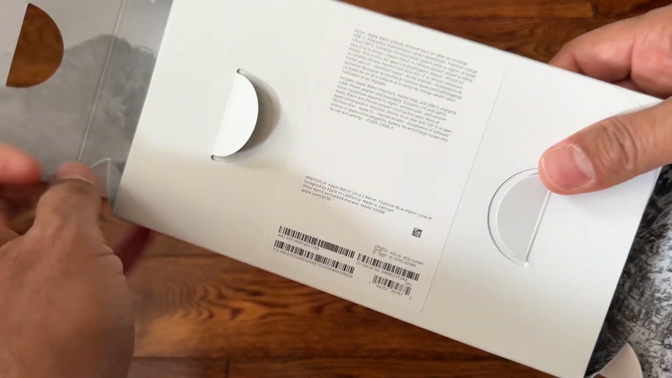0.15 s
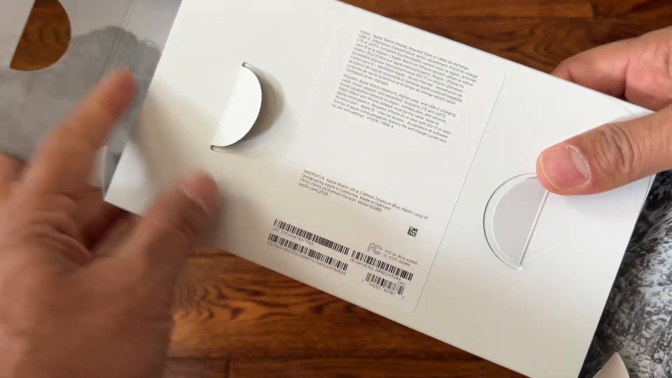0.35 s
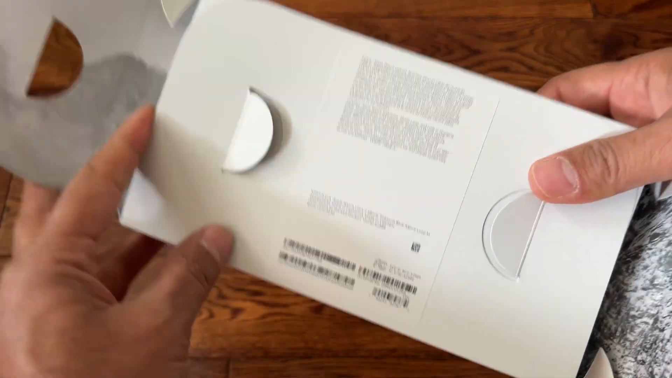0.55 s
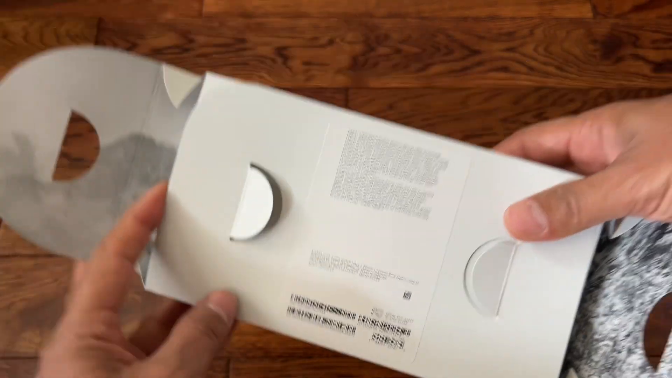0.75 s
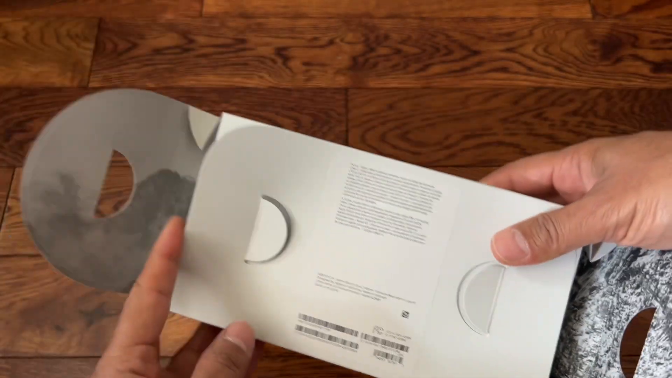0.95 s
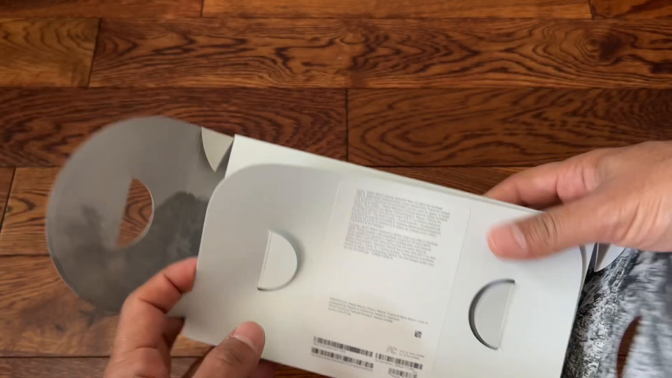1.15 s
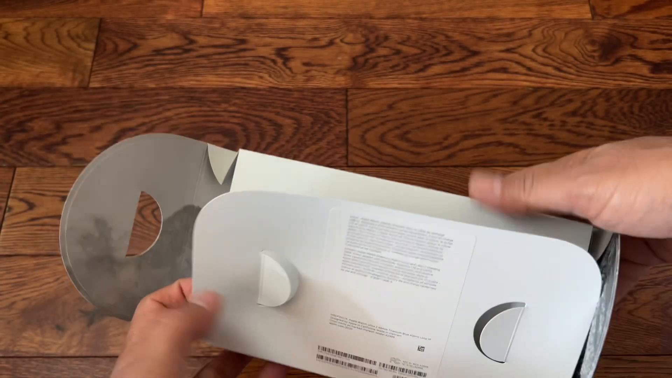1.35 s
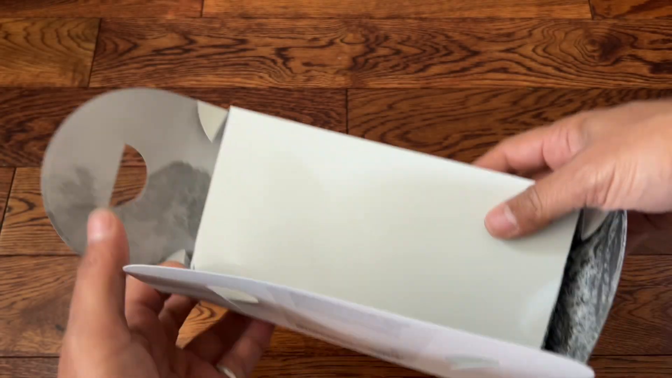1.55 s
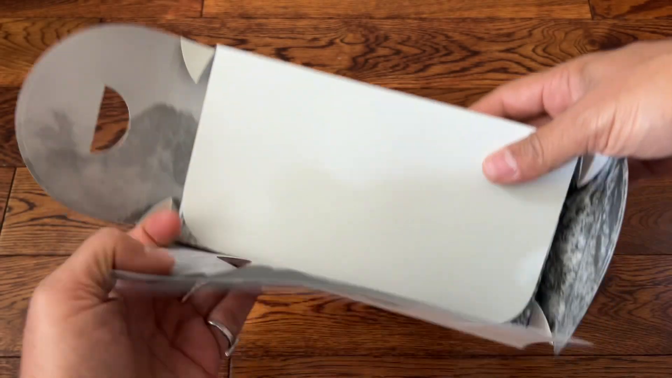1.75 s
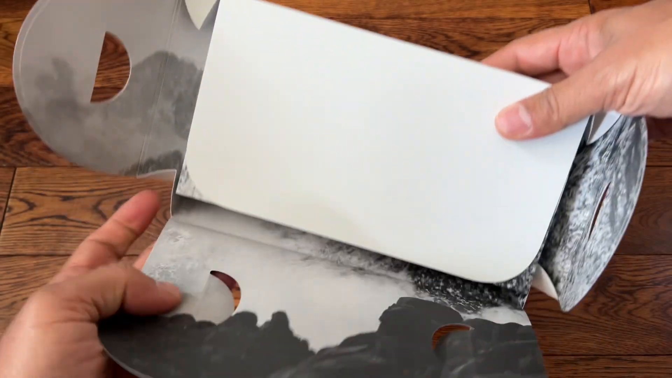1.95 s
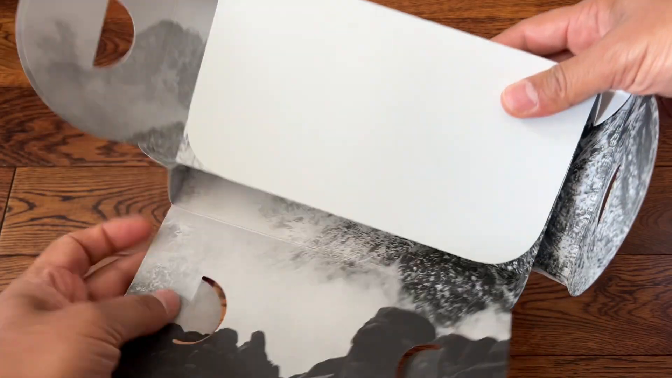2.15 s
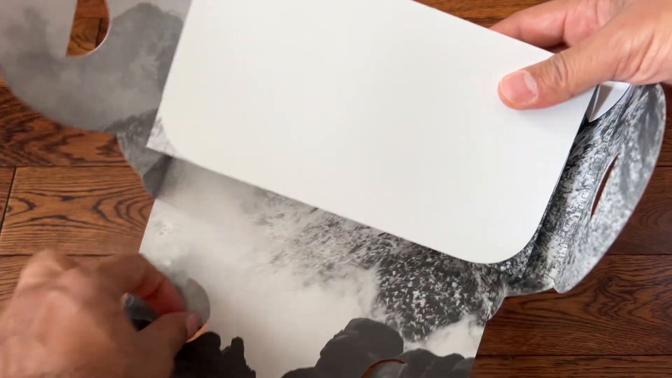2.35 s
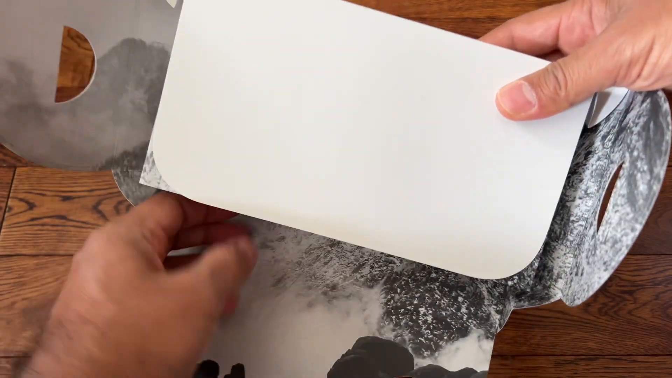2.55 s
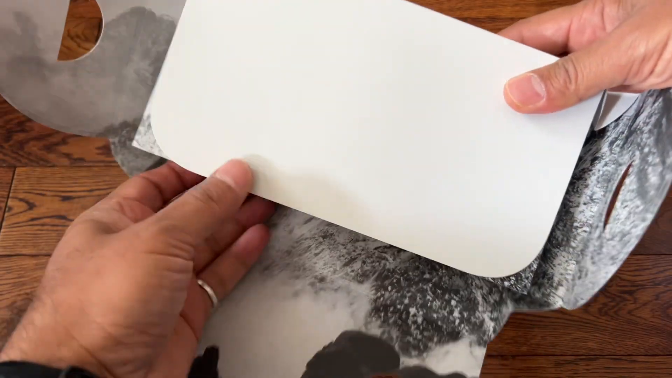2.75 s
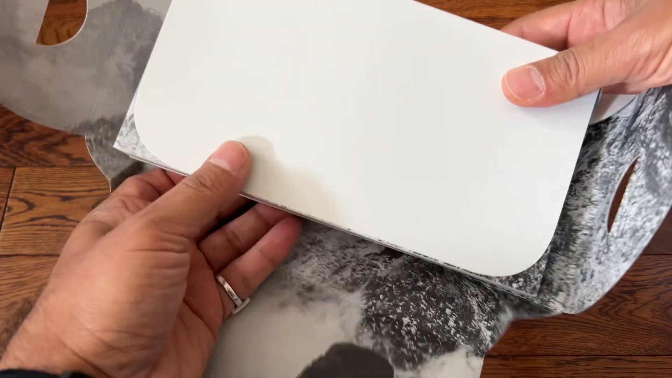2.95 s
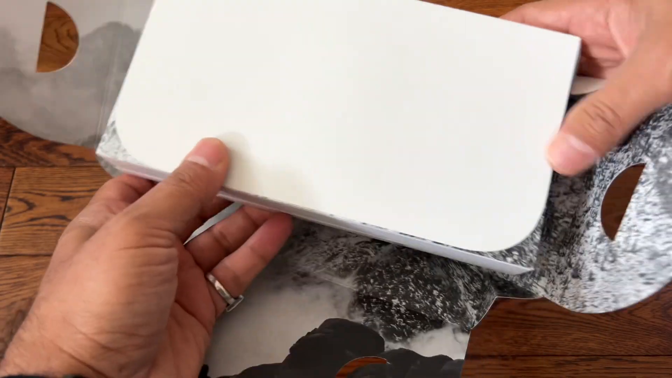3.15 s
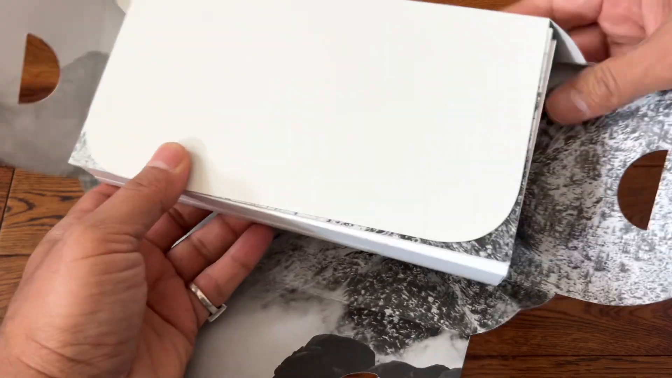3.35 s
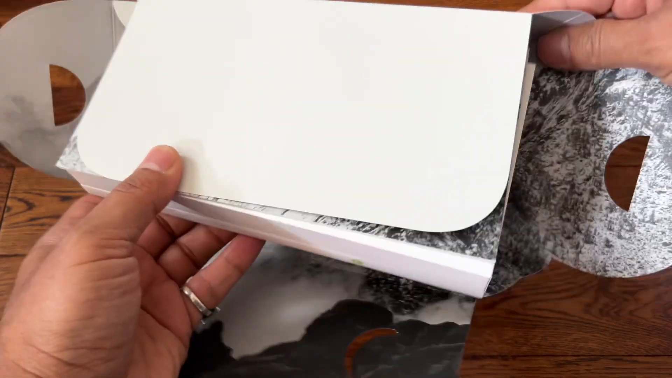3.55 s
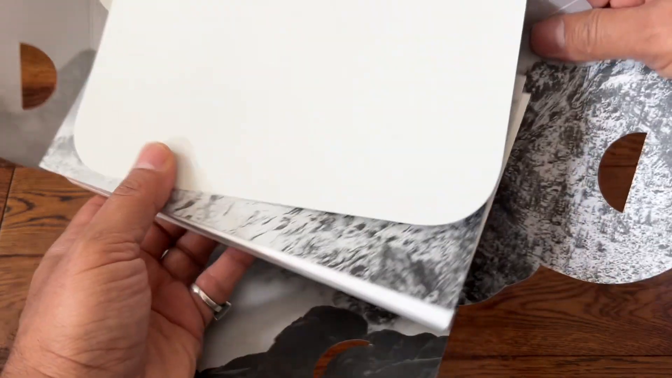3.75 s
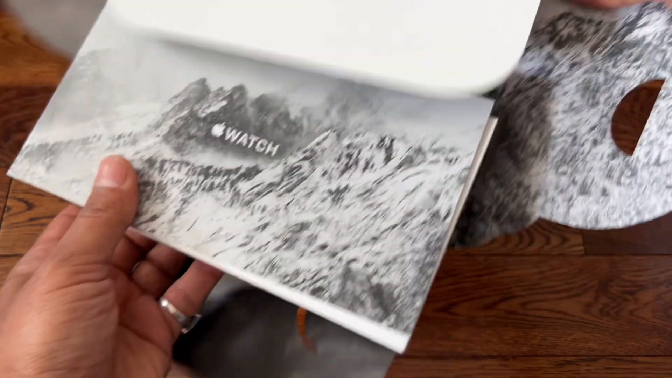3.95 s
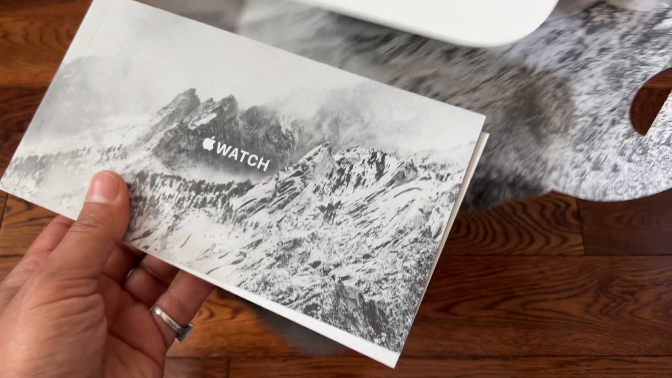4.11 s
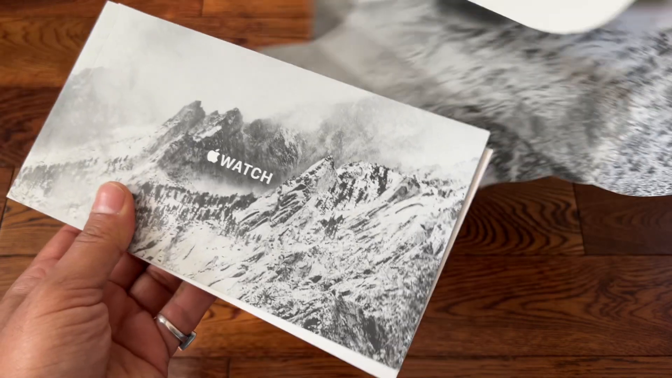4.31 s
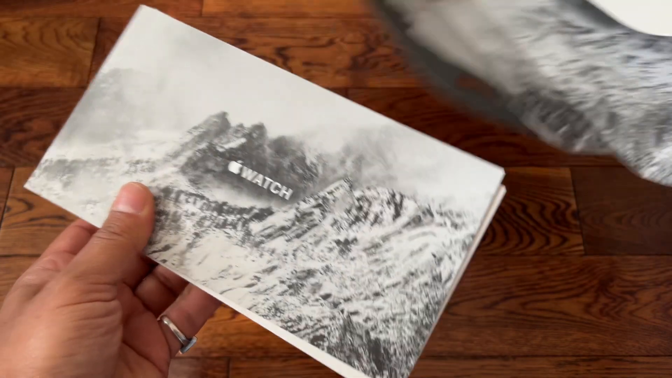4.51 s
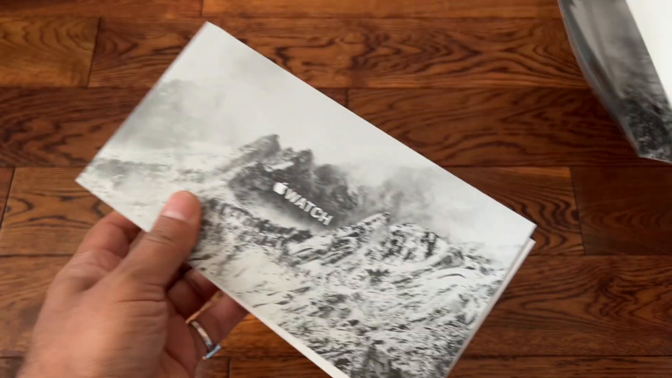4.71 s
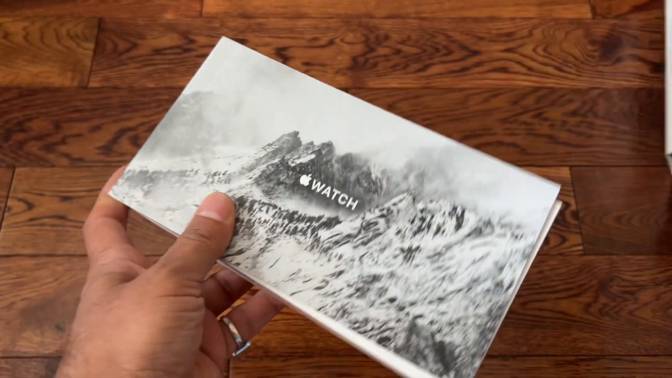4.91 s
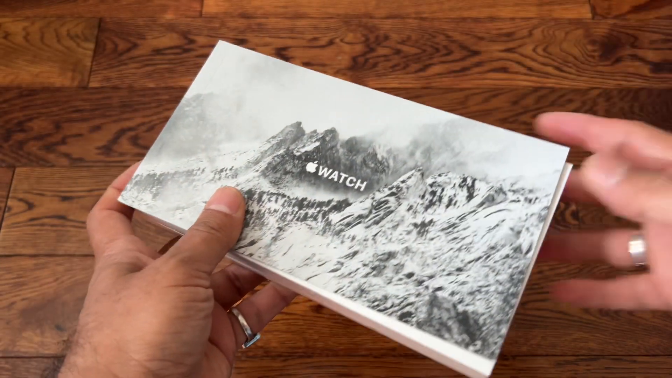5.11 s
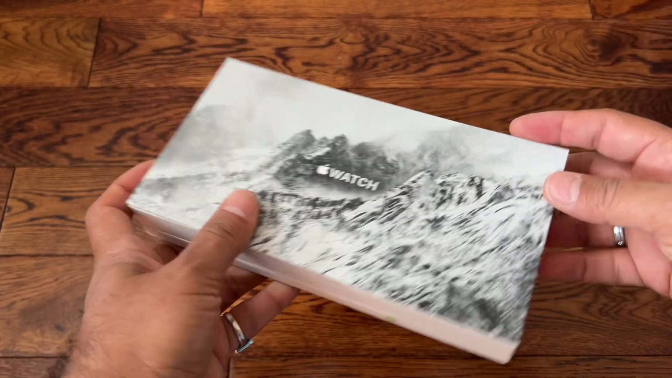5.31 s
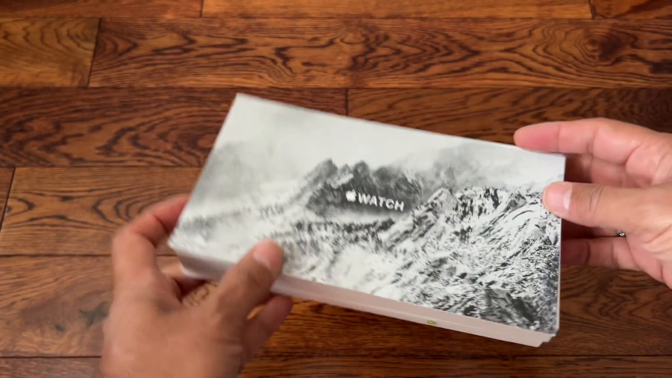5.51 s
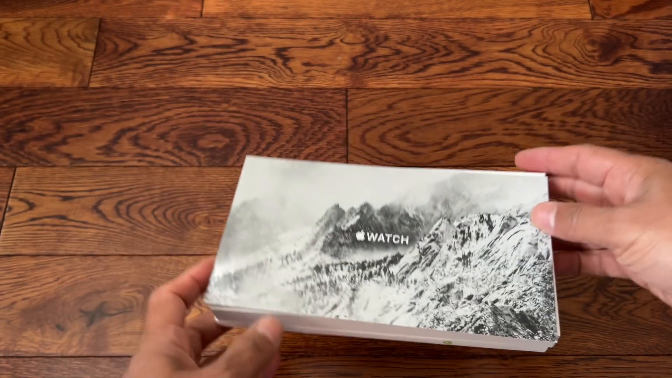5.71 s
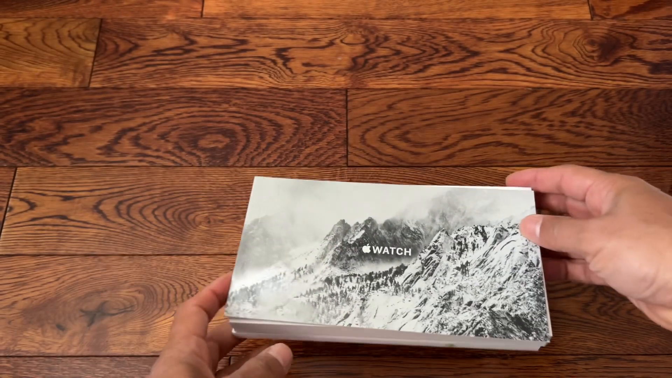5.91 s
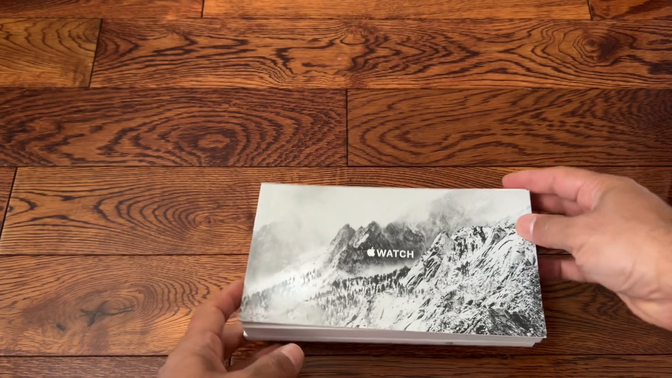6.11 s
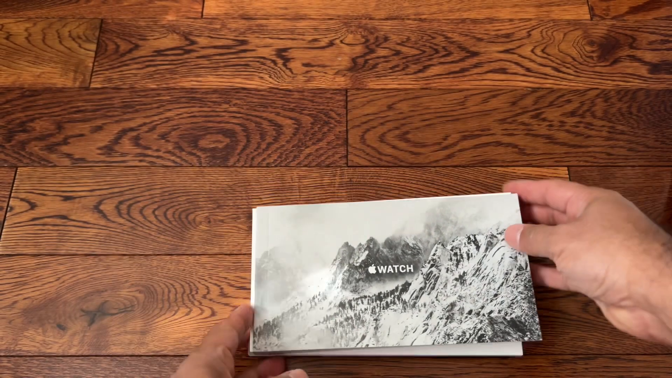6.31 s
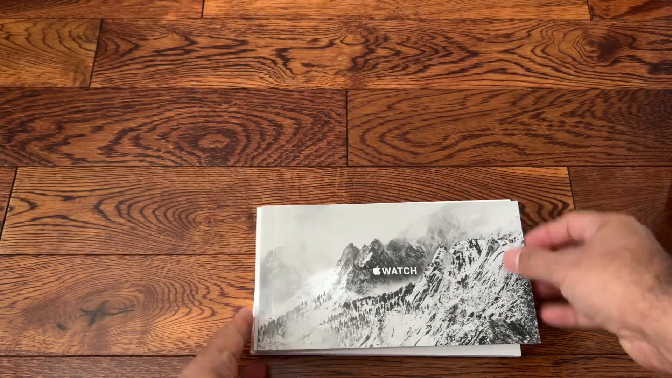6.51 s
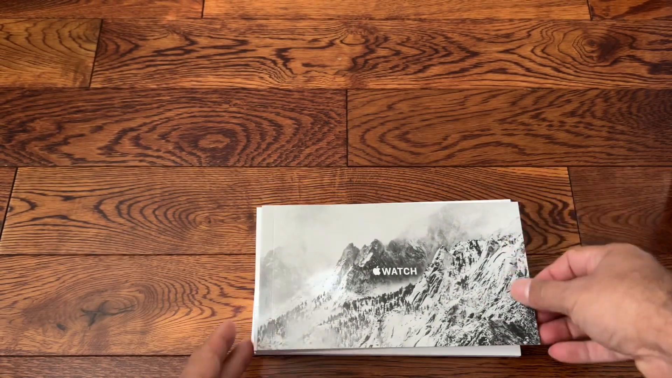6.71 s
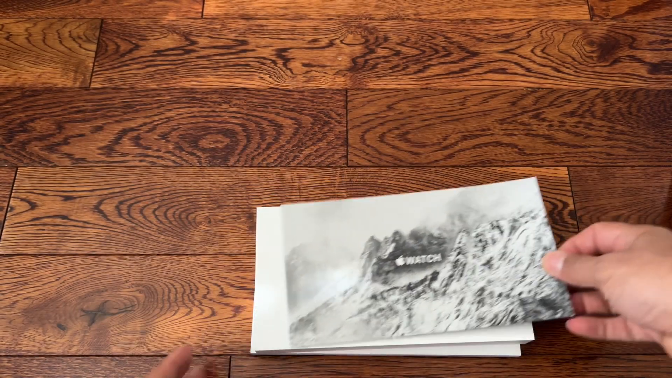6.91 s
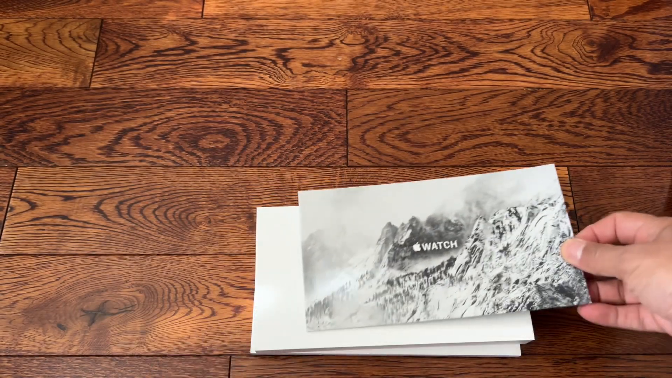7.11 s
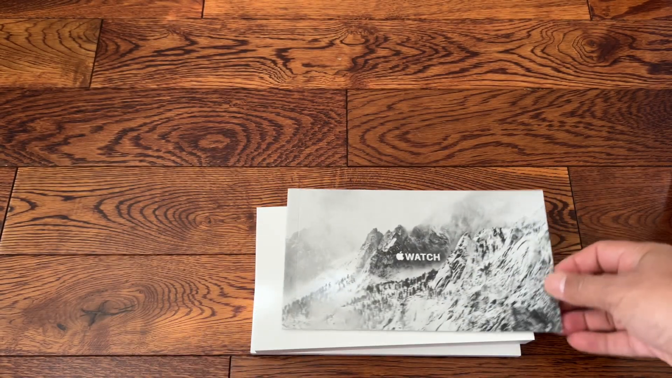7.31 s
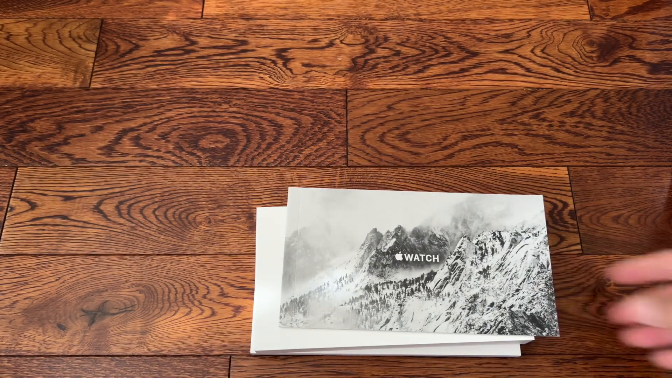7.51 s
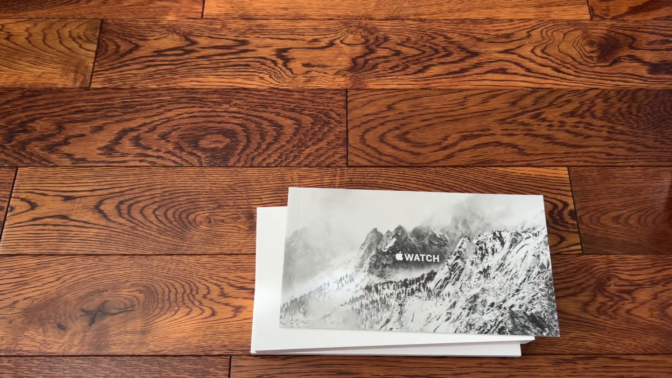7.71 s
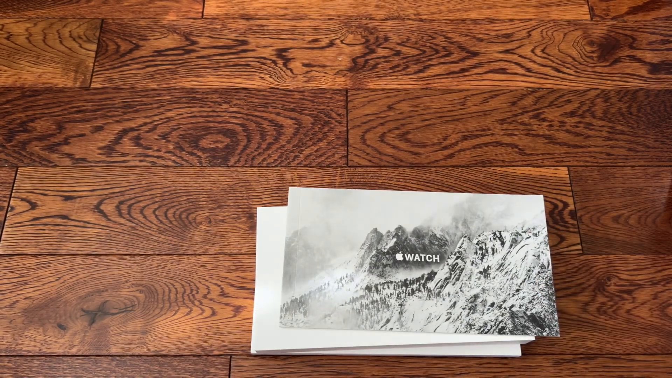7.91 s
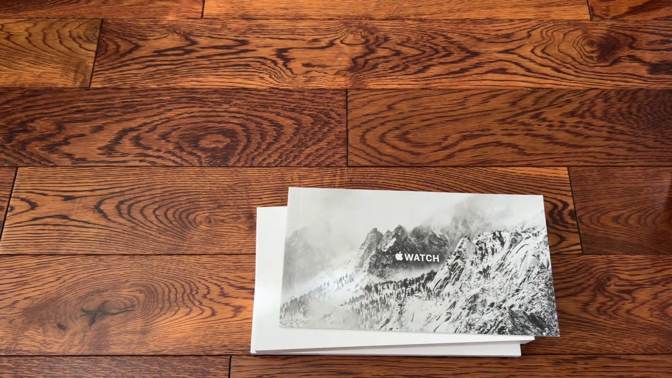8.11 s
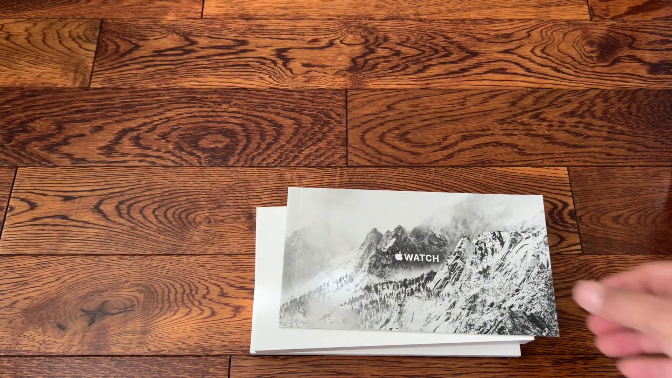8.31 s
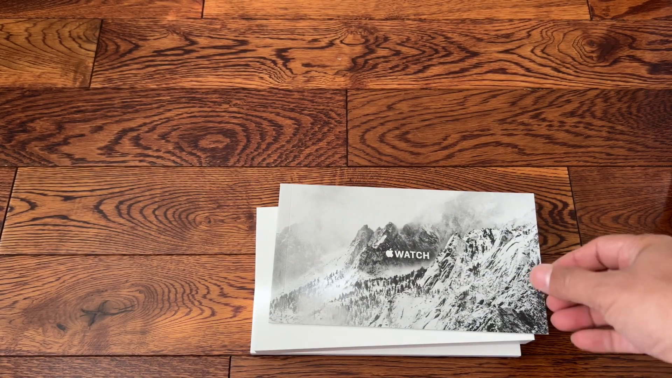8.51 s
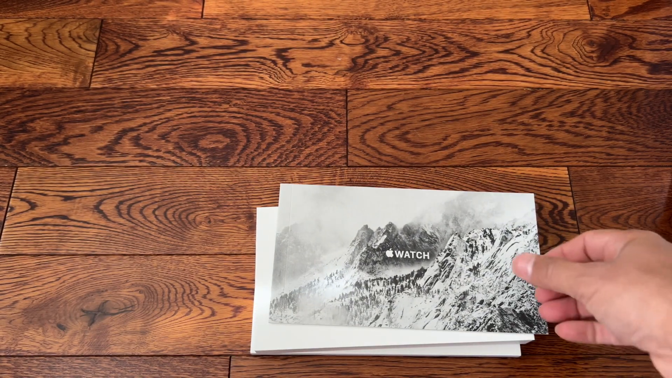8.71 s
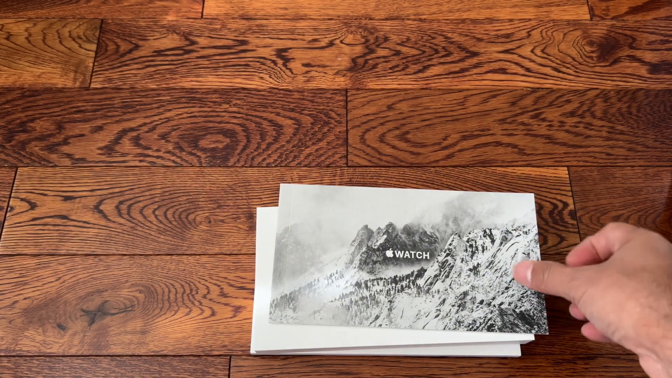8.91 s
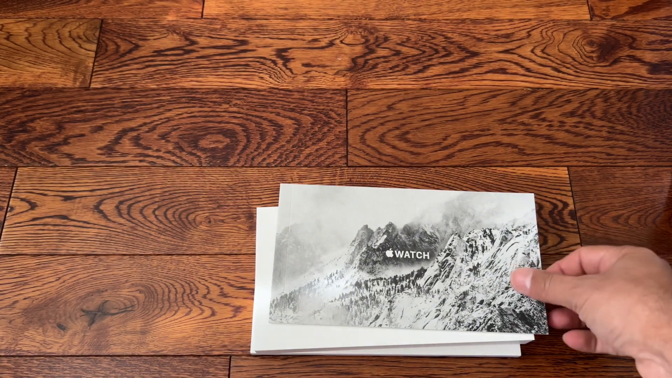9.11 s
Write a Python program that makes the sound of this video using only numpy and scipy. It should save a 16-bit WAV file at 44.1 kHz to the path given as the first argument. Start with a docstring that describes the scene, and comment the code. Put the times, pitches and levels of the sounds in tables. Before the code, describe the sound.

Hands unfold stiff card packaging with rustles, snaps, a short rip and loud flap slaps, drop the sleeve clattering, then set a box down over low hum.

```python
"""Small room with a wooden floor and a humming appliance: hands peel open a cardboard sleeve,
fold back its flaps, slide the box out, drop the sleeve and set the box down.
Contacts: damped modes plus noise cracks. Friction: coloured noise through panel resonances.
Creaks and slides: narrow wandering resonances. Pops: short swings. Rips and crackle: random impulses.
The room answers with decaying noise over the drone and low rumble."""
import sys
import numpy as np
from scipy import signal
from scipy.fft import rfft, irfft, next_fast_len
from scipy.io import wavfile
from scipy.ndimage import uniform_filter1d, map_coordinates

SR = 44100
rng = np.random.default_rng(int(sys.argv[2]) if len(sys.argv) > 2 else 0)


def generate_wav(sig):
    """Save sig (samples, or channels by samples) to the path in sys.argv[1] as 16-bit PCM at SR."""
    pcm = np.round(np.clip(np.atleast_2d(sig).T, -1, 1) * 32767).astype(np.int16)
    wavfile.write(sys.argv[1], SR, pcm)


N = 403515
T = np.arange(SR // 3) / SR  # clock of one short event, s
TOP_HZ = 16000

# Contacts: t/s, level/dB, box thump re level/dB, edge re level before treble tilt/dB
# flaps and card edges slapping
SLAP_HITS = [(1.77, -29, -30, -7), (2.08, -25.5, -9, -16.5), (2.182, -33, -3.5, -8), (6.224, -32, 0, -15.5)]
# creases and glued tabs letting go, corners clicking; same columns
SNAP_HITS = [(.353, -58.5, 2, 1.5), (0.835, -51.5, -4, 3.5), (0.84, -57.5, 1, 10.5),
             (1.239, -45.5, -7, 1.5), (1.289, -51, -16, -21), (1.850, -44.5, -5, 1),
             (1.858, -51.5, -14, 11), (2.083, -37.5, 3, 1.5), (2.248, -41, -7, -8), (3.17, -57, -7, -16),
             (3.276, -50.5, -2, -6), (3.599, -50, -13, -36), (4.659, -52, 1, 1), (5.143, -49, -1.5, -13.5),
             (5.258, -55.5, -10, -7), (5.502, -67.5, 7, -1)]
# fingers and flaps knocking on the box; same columns
KNOCK_HITS = [(1.517, -52.5, -22, -6), (1.712, -32, -9.5, -50), (2.387, -39, -10, -15),
              (2.423, -44.5, -2.5, -7), (2.477, -48, -8, -8), (2.489, -45, 5, -8),
              (2.529, -41.5, -10, -9.5), (2.581, -55, -6, -7), (2.630, -36.5, -19, -13),
              (2.685, -51, -0.5, -4.5), (2.989, -62.5, 13, -4), (3.304, -50.5, 8.5, -13),
              (3.332, -49.5, -3, -7), (3.528, -51.5, 5, -3.5), (3.599, -48.5, -14, -11),
              (3.614, -48.5, -13, -23), (3.847, -45.5, -8, -11), (3.954, -58, -9, -10),
              (4.101, -48.5, 5, -8.5), (4.149, -52, -5, -29), (4.18, -49, -11, -21),
              (4.224, -51.5, 1.5, -21), (4.424, -65.5, -1, 0.5), (5.231, -58, 10.5, -11),
              (6.138, -41.5, -8, -19.5), (7.751, -53.5, 1.5, -17), (7.931, -52, 4.5, -17),
              (8.051, -52.5, -20, -14), (8.281, -60, 6, -12)]
# box settling with its weight; same columns
THUD_HITS = [(3.617, -56.5, 11.5, -20), (3.701, -54, 4, -17), (6.355, -32, 8.5, -12.5),
             (7.775, -54.5, 2.5, -15), (7.96, -38, -5, -49), (8.203, -57, 9, -18)]
# empty sleeve tumbling onto the floor; same columns
TUMBLE_HITS = [(4.658, -33, -3, -20), (4.673, -33, -5.5, -32), (4.684, -37, -13, -26),
               (4.725, -34.5, -5.5, -9.5), (4.733, -32, -2.5, -16), (4.747, -39.5, -8, -10.5),
               (4.773, -29.5, -6.5, 0), (4.785, -33.5, -8, -8.5), (4.794, -34, -1, -4),
               (4.809, -31, -20, -16), (4.83, -28.5, -14, -13.5)]
SNAP_T60_S, KNOCK_T60_S = .011, .025
EDGE_REF_DB = -44.5  # middling snap edge; a bigger break sounds deeper, a smaller one thinner

# Modes of the card: f/Hz, level/dB, t60/s
CARD_MODES = [(316.8, -1.5, 0.1), (367.8, 4, 0.11), (436.4, 4.5, 0.082), (514.3, -2, 0.14),
              (607, 3, 0.0655), (721, 4.5, 0.061), (915, -10, 0.077), (1073, -23.5, 0.024),
              (1495, -17, 0.18)]
# modes of the box; same columns
BOX_MODES = [(68.8, -13, 0.366), (96.5, -3.5, 0.068), (128, -11, 0.28), (167, -2, 0.13),
             (206.4, -8.5, 0.11), (254.3, -3, 0.077)]
# modes of the empty sleeve; same columns
SLEEVE_MODES = [(215.6, 2, 0.074), (298.6, 17, 0.11), (391, 5, 0.14), (569, 2.5, .07), (760, 1, 0.078),
                (1210, -15, 0.21)]
# modes of the lid; same columns
LID_MODES = [(288, -13.5, 0.21), (371, -1.5, 0.12), (452, -1.5, 0.1)]
# near-flat spectra of crack and after-ring: f/Hz, density/(dB per Hz)
CRACK_SPECTRUM, AFTER_SPECTRUM = [(100, 0.0067), (10000, 0.0019)], [(100, 0.026), (10000, 0.013)]
# left-right likeness of the crack: f/Hz, likeness/(-1..1)
CRACK_ALIKE = [(1000, 0.052), (8000, 0.076)]

# Hands and cuffs brushing, one swell per movement: middle t/s, half length/s, level/dB
BRUSHES = [(0.141, 0.068, -58), (0.332, 0.084, -59.5), (0.503, 0.057, -62.5), (1.155, 0.075, -54.5),
           (1.45, 0.11, -58.5), (1.991, 0.26, -50), (2.486, 0.13, -51), (2.712, 0.15, -54.5),
           (3.052, 0.098, -55), (3.357, 0.12, -53.5), (3.953, 0.33, -59.5), (4.357, 0.1, -59),
           (4.65, 0.074, -57.5), (6.262, 0.089, -66.5), (7.534, 0.12, -59), (7.897, 0.17, -58.5),
           (8.239, 0.095, -62)]
# card dragged over card, bending: middle t/s, half length/s, level/dB, flexing re rubbing before trim/dB
CARD_DRAGS = [(0.66, 0.29, -63, 4.5), (1.2, 0.18, -64.5, 10), (2.484, 0.1, -56, 16.5),
              (2.77, 0.17, -54.5, 5.5), (2.962, 0.047, -55, 14), (3.415, 0.31, -60, 5.5),
              (3.7, 0.14, -51.5, 1), (4.085, 0.081, -56, 7.5), (6.056, 0.2, -64, 10),
              (7.974, 0.28, -67, 11.5)]
FLEX_TRIM_DB = -3.5  # on all flexing
# card slides and shudders to rest after each contact: level re contact, rise, decay, flexing re rubbing before trim
SETTLE_DB, SETTLE_RISE_S, SETTLE_T60_S, SETTLE_FLEX_DB = -26, 0.0038, 0.99, 12.5
BRUSH_RUB_DB, RUB_HISS_DB = -6.5, -8.5  # a brushing hand also rubs the face; rubbed card also hisses
# flexing sheet: f/Hz, density/(dB per Hz)
FLEX_SPECTRUM = [(30, -20), (70, 10.5), (140, -5.5), (300, 2.5), (450, -2.5), (700, -12.5), (1500, -85)]
# rubbed face; same columns
FACE_SPECTRUM = [(250, -43.5), (550, -5.5), (800, -12), (1300, -8.5), (1800, -9), (2600, -10.5),
                 (3600, -16.5), (7000, -42.5)]
# fibre hiss; same columns
HISS_SPECTRUM = [(1500, -32.5), (2800, 4), (3700, 6), (5500, 6.5), (8500, 10), (10000, -7), (12000, -1),
                 (15500, -11.5)]
# catching fibres; same columns
CRACKLE_SPECTRUM = [(400, -23), (900, 5.5), (2200, 3), (5000, 8), (9000, -24), (15000, -30)]
CRACKLE_PER_S, CRACKLE_DB, CRACKLE_CLUMP_DB = 230, -9.5, 1  # fibres caught, level re rubbing, clump depth
# panel resonances colouring friction: f/Hz, width/Hz, level/dB
PANEL_RESONANCES = [(801, 61, 6.5), (930, 92, 6.5), (1355, 22.5, -2), (1610, 150, 4.5), (2030, 83, 3),
                    (2320, 79, 5), (2620, 19.3, 6), (3900, 550, 3.5)]

# Creaks or groans, fingers and card sliding under pressure:
# t/s, length/s, level/dB, lower f/Hz, upper f/Hz, upper re lower/dB
CREAK_EVENTS = [(1.116, 0.07, -51.5, 785, 1770, 1.5), (1.509, 0.029, -51.5, 780, 1740, -18),
                (1.846, 0.0037, -33, 1830, 5550, -8), (1.856, 0.0087, -29.5, 1880, 5380, -2),
                (2.34, 0.1, -54.5, 820, 2210, -3), (2.771, 0.067, -51.5, 823, 1760, -5),
                (2.48, 0.065, -43, 238, 388, -4), (7.915, 0.033, -45, 314, 465, 1),
                (7.982, 0.05, -44.5, 390, 505, -8)]
CREAK_WIDTH, CREAK_DRIFT = 0.2, 0.0144  # shares of pitch

# Card peeling or scraping in quick slips: t/s, length/s, level/dB, squeak f/Hz, squeak share/(0..1)
SCRAPE_EVENTS = [(1.209, 0.019, -40, 2140, 0.92), (1.256, 0.017, -42.5, 3000, 0.06),
                 (1.783, 0.074, -41.5, 2800, 0.75), (2.075, 0.0076, -30.5, 4900, 0.7),
                 (2.511, 0.039, -46.5, 6200, 1), (3.762, 0.097, -45, 1430, 0.1),
                 (3.815, 0.04, -40.5, 1520, 0.47), (4.707, 0.061, -40.5, 1200, 0.08),
                 (4.779, 0.058, -38, 1120, 0.4), (6.321, 0.02, -50, 1400, 0.7),
                 (6.838, 0.13, -60.5, 2630, 0.82), (7.013, 0.046, -61.5, 3000, 1),
                 (8.473, 0.015, -57, 1700, 1), (8.756, 0.085, -68.5, 1900, 1),
                 (9.131, 0.05, -63, 2200, 0.6)]
# rasp of a scrape, then its near-flat squeak source: f/Hz, density/(dB per Hz)
SCRAPE_SPECTRUM = [(100, -16.0), (300, -4.5), (1000, 8.5), (3500, 6.5),
                   (9000, 3), (12000, -16.0), (16000, -6.0)]
SQUEAK_SPECTRUM = [(100, 0.0018), (10000, 0.11)]

# Panels buckling or landing flat: t/s, level/dB, f/Hz, half length/cycles
POP_EVENTS = [(1.2407, -17, 1110, 0.21), (1.7145, -21.5, 616, 0.42), (2.0856, -9.5, 500, 0.5),
              (2.3905, -26, 750, 0.59), (2.530, -23, 740, 0.38), (2.535, -22, 346, 0.92),
              (2.6322, -17.5, 860, 0.24), (3.53, -31.5, 990, 0.48), (3.6005, -31, 1800, 0.37),
              (4.2265, -42, 1000, .35), (4.733, -26, 1290, 0.88), (4.7745, -14.5, 850, .4),
              (4.831, -24.5, 1580, 0.6), (4.840, -20, 302, 1), (6.1395, -28, 970, 0.66),
              (6.3646, -14.5, 183, 0.53)]

# Glued strip tearing away: t/s, length/s, level/dB
RIP_EVENTS = [(1.348, 0.047, -37), (1.391, .075, -44)]
FIBRES_PER_S, FIBRE_SPREAD_DB = 5600, 1.5  # fibres parting, scatter of strength
# parting fibres: f/Hz, density/(dB per Hz)
FIBRE_SPECTRUM = [(200, -26), (450, -2), (750, 1.5), (1700, -0.5), (4000, 0), (9000, -10), (11000, -15.5),
                  (16000, -16)]
# resonances of the pulled strip: f/Hz, width/Hz, level/dB
STRIP_RESONANCES = [(1100, 300, 3.5), (1750, 150, 6), (2860, 200, 5.5), (4200, 230, 1.5),
                    (5140, 670, -12.5), (6200, 400, 6.5), (7160, 500, -9.5), (8440, 1100, 10.5)]

# Stiff flap springing free: t/s, level/dB
PING_EVENTS = [(1.793, -41), (1.854, -44.5)]
# its thin modes: f/Hz, level/dB, t60/s
FLAP_MODES = [(1216, 4, 0.29), (2059, -2.5, 0.14), (2620, 2.5, 0.33), (3150, 0.5, 0.16), (3746, 2.5, 0.23),
              (5250, -4, 0.201)]
PING_LEAN_DB = 3.5  # left up, right down
PING_ROUGH_DB, PING_ROUGH_PER_S, PING_WAVER_RAD = 4.5, 110, 1.0

# Card gliding along an edge or fingertip: t/s, length/s, level/dB, growth over stroke/dB,
# lower f/Hz, upper f/Hz, upper re lower/dB, pitch glide/share, rasp re lower resonance/dB
SLIDE_EVENTS = [(1.97, 0.108, -45.5, 9, 2900, 4510, -0.5, 0.027, 5),
                (1.975, .1, -53, 11, 480, 720, -1, .05, -20),
                (2.10, 0.13, -51.5, -4, 2250, 3430, -12, -.06, -18),
                (2.42, 0.24, -53, -1, 2190, 1640, -1, -.08, -12),
                (3.625, 0.16, -58, 4, 921, 2650, -1, .06, 0),
                (4.16, 0.265, -63.5, 6, 3130, 4350, -1.5, 0.029, -4),
                (4.27, .155, -65, 5.5, 2350, 5680, -6, .05, -15),
                (4.835, .11, -45, -20, 1200, 900, -2.5, -.04, -7),
                (6.178, 0.031, -42.5, 20, 810, 1020, -2.5, -.1, -13.5),
                (8.425, 0.06, -64.5, 5, 1800, 2500, 0, .02, -2),
                (8.668, 0.1, -62.5, -1, 1960, 2520, -0.5, -0.0091, -10.5)]
SLIDE_WIDTH, SLIDE_DRIFT = .17, .015  # shares of pitch
SLIPS_PER_S, SLIP_DEPTH_DB = 170, 3
# rasp of a slide: f/Hz, density/(dB per Hz)
RASP_SPECTRUM = [(200, -22), (800, -4), (2000, 0), (4500, -2), (9000, -9), (15000, -24)]

# Fingertips slipping on the lid: t/s, level/dB, f/Hz
TICK_EVENTS = [(7.022, -50, 3520), (8.897, -50, 3400)]
TICK_RISE_S, TICK_T60_S = 0.0028, 0.038

# Room rumble: f/Hz, density/(dB per Hz)
AIR_SPECTRUM = [(25, -37.5), (42, -11), (65, -8), (125, 0), (155, -18), (250, -17.5), (400, -22),
                (600, -31), (1500, -30.5), (4000, -41), (7200, -41), (9500, -55.5), (16000, -80)]
AIR_DB = -55.5
# appliance lines: f/Hz, level/dB
HUM_LINES = [(121.9, -60.5), (84, -67)]
# left-right likeness of the room: f/Hz, likeness/(-1..1)
ROOM_LIKENESS = [(35, 0.27), (70, 1), (130, 0.95), (290, 0.92), (640, 0.11), (3000, 0.18)]
# left-right likeness close by; same columns
NEAR_LIKENESS = [(40, 0.8), (200, 0.33), (640, 0.96), (1400, 0.54), (3100, 0.29), (7000, 0.25), (15000, 1)]
# reverberation: f/Hz, t60/s
ROOM_T60 = [(80, 0.43), (250, 0.15), (1000, 0.45), (4000, 0.54), (12000, 0.33)]
ECHO_SPECTRUM = [(100, 0.02), (10000, 0.017)]  # near-flat; f/Hz, density/(dB per Hz)


def amp(db):
    """Decibels to gain."""
    return 10 ** (np.asarray(db) / 20)


def lean(db):
    """Stereo gains: left up and right down by db."""
    return amp([[db], [-db]])


def unit(x):
    """Scale to rms 1."""
    return x / np.sqrt(np.mean(x ** 2) + 1e-20)


def blow(x):
    """Scale to the energy of 25 ms at rms 1."""
    return unit(x) * np.sqrt(.025 * SR / x.shape[-1])


def along(points, hz):
    """Interpolate (f/Hz, value) points on a log frequency axis."""
    f, v = np.transpose(points)
    return np.interp(np.log(hz + 1), np.log(f + 1), v)


def wobble(knots_per_s, size=N):
    """Smooth random curve through normal knots."""
    knots = rng.standard_normal(int(size * knots_per_s / SR) + 4)
    return map_coordinates(knots, [np.arange(size) * knots_per_s / SR])


def filtered(x, response):
    """Multiply the spectrum of x by a complex response of frequency."""
    n = x.shape[-1]
    m = next_fast_len(n + 8192)
    return irfft(rfft(x, m) * response(np.fft.rfftfreq(m, 1 / SR)), m)[..., :n]


def band(x, lo_hz, hi_hz, order=2):
    """Causal band-pass."""
    sos = signal.butter(order, [lo_hz, min(hi_hz, SR / 2 - 1)], 'band', fs=SR, output='sos')
    return signal.sosfilt(sos, x)


def noise(spectrum, alike, size=N):
    """Coloured stereo noise of rms 1; likeness sets the mid-side split."""
    def response(hz):
        turn = np.arccos(np.clip(along(alike, hz), -1, 1)) / 2
        return amp(along(spectrum, hz)) * [np.cos(turn), np.sin(turn)]
    mid, side = filtered(rng.standard_normal((2, size)), response)
    return unit(np.array([mid + side, mid - side]))


def add(track, s, x):
    """Mix x in at time s."""
    part = track[:, max(round(s * SR), 0):][:, :x.shape[-1]]
    part += x[..., :part.shape[-1]]


def stroke(length_s):
    """Envelope of one short pull: quick rise, hold, release."""
    progress = T / length_s
    return (1 - np.exp(-(progress / 0.12) ** 2)) / (1 + progress ** 6)


def panel(x, resonances=PANEL_RESONANCES, shift=1):
    """The sheet radiates friction most strongly at its resonances; bending shifts them."""
    def response(f):
        return amp(sum(db / (1 + (2 * (f - hz * shift) / width) ** 2) for hz, width, db in resonances))
    return unit(filtered(x, response))


def hum():
    """Appliance lines drone unsteadily over the room's low rumble."""
    t = np.arange(N) / SR
    lines = np.zeros(N)
    for hz, db in HUM_LINES:
        level = amp(db + 2.6 * wobble(2.5)) * np.sqrt(2)
        lines += level * np.sin(2 * np.pi * hz * t + 0.28 * wobble(18))
    return (lines + amp(AIR_DB) * noise(AIR_SPECTRUM, ROOM_LIKENESS)) * lean(.5)


def patchy(x, depth_db):
    """Resonances come and go as the grip on the card shifts."""
    z = signal.stft(x, nperseg=512)[2]
    field = uniform_filter1d(rng.standard_normal(z.shape[1:]), size=4, axis=0)
    field = uniform_filter1d(field, size=14, axis=1)
    return unit(signal.istft(z * amp(depth_db * unit(field)), nperseg=512)[1][:, :x.shape[-1]])


def swell(middle_s, half_s):
    """Power of one movement: it speeds up, glides and stops."""
    return np.exp(-2 * np.abs((np.arange(N) / SR - middle_s) / half_s) ** 3)


def friction():
    """Gains of flexing, rubbing and hiss: brushes, drags and settling card add in power."""
    brush = sum(amp(db) ** 2 * swell(s, half) for s, half, db in BRUSHES)
    settle, t = np.zeros((1, N)), np.arange(SR) / SR
    for s, db, *_ in SLAP_HITS + SNAP_HITS + KNOCK_HITS + THUD_HITS + TUMBLE_HITS:
        decay = amp(db + SETTLE_DB - 60 * t / SETTLE_T60_S)
        add(settle, s, (decay * (1 - np.exp(-t / SETTLE_RISE_S))) ** 2)
    rub = settle[0].copy()
    flex = amp(SETTLE_FLEX_DB) ** 2 * settle[0]
    for s, half, db, flex_db in CARD_DRAGS:
        power = amp(db) ** 2 * swell(s, half)
        rub += power
        flex += power * amp(flex_db) ** 2
    face = rub + amp(BRUSH_RUB_DB) ** 2 * brush
    hiss = brush + amp(RUB_HISS_DB) ** 2 * rub
    return np.sqrt([flex, face, hiss])


def crackle():
    """Single fibres catch and snap free, in clumps."""
    catches = (rng.random(N) < CRACKLE_PER_S / SR) * rng.uniform(-0.88, 1, (2, N))
    clumps = amp(CRACKLE_CLUMP_DB * np.tanh(wobble(60)))
    return panel(filtered(catches * clumps, lambda hz: amp(along(CRACKLE_SPECTRUM, hz))))


def rubbing():
    """Skin, cloth and card slide over each other: the sheet flexes, its face rubs, fibres hiss and crackle."""
    flex_gain, face_gain, hiss_gain = friction()
    grip_db = 3.85 * wobble(41)
    flex = flex_gain * amp(grip_db + FLEX_TRIM_DB) * patchy(noise(FLEX_SPECTRUM, NEAR_LIKENESS), depth_db=4.5)
    face = face_gain * amp(grip_db) * panel(patchy(noise(FACE_SPECTRUM, NEAR_LIKENESS), depth_db=2.4))
    hiss = hiss_gain * amp(grip_db / 4) * patchy(noise(HISS_SPECTRUM, NEAR_LIKENESS), depth_db=1.2)
    fibres = face_gain * amp(CRACKLE_DB) * crackle()
    grain = unit(amp(0.75 * wobble(810) + 0.84 * wobble(110)))
    return (flex + fibres + grain * (face + hiss)) * lean(1.15)


def ring(modes, detune, scatter_db):
    """Damped modes; grip and struck spot change their pitch and strength."""
    hz, db, t60 = np.transpose(modes)[:, :, None]
    pitch, level = rng.standard_normal((2, len(modes), 1))
    decay = amp(db + scatter_db * level - 60 * T / t60)
    return np.sum(decay * np.sin(2 * np.pi * hz * np.exp(detune * pitch) * T), axis=0)


def burst(t60_s, tail_db, tail_t60_s):
    """A brief crack, nearly independent left and right, and the sheet's dense after-ring."""
    crack = noise(CRACK_SPECTRUM, CRACK_ALIKE, size=len(T)) * amp(-60 * T / t60_s)
    after = panel(noise(AFTER_SPECTRUM, NEAR_LIKENESS, size=len(T))) * amp(tail_db - 60 * T / tail_t60_s)
    return (crack + after) * (1 - np.exp(-T / 0.00099))


def contacts(table, modes, travel_s, soft_hz, crack_t60_s, push_db, dull_db, detune, lean_db, deepen=0):
    """Each contact thumps the box, rings the card and cracks at its edge; bending waves make it chirp down."""
    def bend(hz):
        # delay = travel_s * (sqrt(1000 / f) - 1/4): lows arrive late
        return np.exp(-2j * np.pi * travel_s * (2 * np.sqrt(1000 * hz) - hz / 4))

    out = np.zeros((2, N))
    for s, db, thump_db, edge_db in table:
        thump = blow(band(ring(BOX_MODES, detune=0.038, scatter_db=6.0), 70, 350, order=3))
        push = blow(band(burst(.009, -22, .12), 350, 1500))
        tone = blow(ring(modes, detune, scatter_db=0.5))
        card = blow(band(tone + amp(push_db) * push, 175, soft_hz))
        clack = blow(band(burst(crack_t60_s, -4.5, 0.039), 760, 2420, order=3))
        crack = band(burst(crack_t60_s, -13, 0.049), 2800, 11600, order=3)
        crack = blow(band(crack, 1880, 5500, order=1))
        pan_db = rng.normal(lean_db, 0.74)  # left over right
        tilt_db = dull_db + deepen * (db + edge_db - EDGE_REF_DB)
        edge = (amp(tilt_db) * clack + amp(-tilt_db) * crack) * lean(pan_db / 2)
        hit = card + amp(thump_db) * thump + amp(edge_db) * edge
        add(out, s - travel_s / 3, amp(db) * filtered(hit, bend))
    return out


def room(x):
    """The walls answer after a few milliseconds; each frequency dies at its own speed."""
    echoes = noise(ECHO_SPECTRUM, ROOM_LIKENESS, size=len(T))
    hz, t, z = signal.stft(echoes, SR, nperseg=256)
    decay = amp(-60 * t / along(ROOM_T60, hz)[:, None])
    tail = signal.istft(z * decay, SR, nperseg=256)[1][:, :len(T)]
    tail = tail * (1 - np.exp(-(T / 0.006) ** 2))
    return signal.fftconvolve(x, tail / np.linalg.norm(tail[0]), axes=1)[:, :N]


def sing(hz, width, clock):
    """A narrow resonance kept going by uneven slips; the clock bends its pitch."""
    size = len(clock)
    drive = np.array([wobble(hz * width, size=size) + 1j * wobble(hz * width, size=size) for _ in range(2)])
    apart = np.clip(hz / 2500, 0, 1)  # higher is wider
    mid, side = np.real(drive * np.exp(2j * np.pi * hz * clock)) * [[1], [0.93 * apart]]
    return unit(np.array([mid + side, mid - side]))


def creaks():
    """Uneven slips keep two narrow resonances going; their pitch drifts with the pressure."""
    out = np.zeros((2, N))
    for s, length, db, low_hz, high_hz, high_db in CREAK_EVENTS:
        clock = np.cumsum(np.exp(CREAK_DRIFT * wobble(25, size=len(T)))) / SR
        low = sing(low_hz, CREAK_WIDTH, clock)
        high = amp(high_db) * sing(high_hz, CREAK_WIDTH, clock)
        add(out, s, amp(db) * stroke(length) * unit(low + high))
    return out


def scrapes():
    """Fibres catch and let go many times a second; an edge may squeak in a narrow band."""
    out = np.zeros((2, N))
    for s, length, db, hz, squeak in SCRAPE_EVENTS:
        rasp = noise(SCRAPE_SPECTRUM, NEAR_LIKENESS, size=len(T))
        source = noise(SQUEAK_SPECTRUM, NEAR_LIKENESS, size=len(T))
        tone = unit(band(source, hz * 0.848, hz * 1.053, order=1))
        slips = unit(amp(2.5 * wobble(500, size=len(T))))
        bent = np.exp(rng.normal(0, .06))
        rub = panel(np.sqrt(1 - squeak) * rasp + np.sqrt(squeak) * tone, shift=bent)
        add(out, s, amp(db) * stroke(length) * slips * rub)
    return out


def pops():
    """A panel flips through: a swing or two pushes and pulls the air."""
    out = np.zeros((2, N))
    for s, db, hz, cycles in POP_EVENTS:
        turns = hz * (T - T.mean())
        swing = np.sin(2 * np.pi * turns) * np.exp(-(turns / cycles) ** 2 / 2)
        add(out, s - T.mean(), -amp(db) * swing)
    return out


def rips():
    """Fibres part one by one, in clumps, and sound through the strip being pulled."""
    out = np.zeros((2, N))
    for s, length, db in RIP_EVENTS:
        strength_db = FIBRE_SPREAD_DB * rng.standard_normal(len(T)) + 2.5 * wobble(161, size=len(T))
        parting = (rng.random(len(T)) < FIBRES_PER_S / SR) * amp(strength_db)
        fibres = parting * (rng.choice([-1, 1], len(T)) + 0.66 * rng.standard_normal((2, len(T))))
        coloured = filtered(fibres, lambda hz: amp(along(FIBRE_SPECTRUM, hz)))
        add(out, s, amp(db) * stroke(length) * panel(coloured, STRIP_RESONANCES))
    return out


def pings():
    """High modes ring on after the flap lets go; it chatters, so each wavers in level and phase by itself."""
    out = np.zeros((2, N))
    for s, db in PING_EVENTS:
        for hz, mode_db, t60 in FLAP_MODES:
            rough = unit(amp(PING_ROUGH_DB * wobble(PING_ROUGH_PER_S, size=len(T))))
            waver = PING_WAVER_RAD * wobble(PING_ROUGH_PER_S, size=len(T))
            note = rough * np.sin(2 * np.pi * hz * T + waver)
            add(out, s, amp(db + mode_db - 60 * T / t60) * note * (1 - np.exp(-T / 0.007)))
    return out * lean(PING_LEAN_DB)


def slides():
    """Card sticks and slips; resonances glide as the free length changes, and it stops on leaving the edge."""
    out = np.zeros((2, N))
    for s, length, db, growth_db, low_hz, high_hz, high_db, glide, rasp_db in SLIDE_EVENTS:
        progress = T / length
        travel = np.minimum(progress, 1) - .5
        clock = np.cumsum(np.exp(glide * travel + SLIDE_DRIFT * wobble(25, size=len(T)))) / SR
        low = sing(low_hz, SLIDE_WIDTH, clock)
        high = amp(high_db) * sing(high_hz, SLIDE_WIDTH, clock)
        rasp = amp(rasp_db) * noise(RASP_SPECTRUM, NEAR_LIKENESS, size=len(T))
        slips = unit(amp(SLIP_DEPTH_DB * wobble(SLIPS_PER_S, size=len(T))))
        contact = (1 - np.exp(-(progress / .1) ** 2)) / (1 + progress ** 24)
        add(out, s, amp(db + growth_db * travel) * contact * slips * unit(low + high + rasp))
    return out


def ticks():
    """A fingertip slips once on the glossy lid and leaves a small clear note."""
    out = np.zeros((2, N))
    for s, db, hz in TICK_EVENTS:
        note = np.sin(2 * np.pi * hz * T + 1.4 * wobble(400, size=len(T)))
        add(out, s, amp(db - 60 * T / TICK_T60_S) * (1 - np.exp(-(T / TICK_RISE_S) ** 2)) * note)
    return out


def scene():
    """All the handling, close by, in the humming room."""
    snaps = contacts(SNAP_HITS, CARD_MODES, travel_s=0.00053, soft_hz=2646, crack_t60_s=SNAP_T60_S,
                     push_db=-2, dull_db=-0.35, detune=0.1, lean_db=2.5, deepen=0.43)
    knocks = contacts(KNOCK_HITS, CARD_MODES, travel_s=0.00147, soft_hz=1475, crack_t60_s=KNOCK_T60_S,
                      push_db=-4.0, dull_db=2.5, detune=0.059, lean_db=-0.5)
    slaps = contacts(SLAP_HITS, CARD_MODES, travel_s=0.00594, soft_hz=1550, crack_t60_s=0.033,
                     push_db=-9.5, dull_db=2.0, detune=0.029, lean_db=0.5)
    thuds = contacts(THUD_HITS, LID_MODES, travel_s=0.00177, soft_hz=493, crack_t60_s=0.011,
                     push_db=1.0, dull_db=2.0, detune=0.067, lean_db=0.0)
    tumble = contacts(TUMBLE_HITS, SLEEVE_MODES, travel_s=0.0014, soft_hz=1840, crack_t60_s=SNAP_T60_S,
                      push_db=-5.5, dull_db=0.8, detune=0.081, lean_db=0.7)
    handling = snaps + knocks + slaps + thuds + tumble
    handling += creaks() + scrapes() + pops() + rips() + pings() + slides() + ticks()
    return handling + amp(-10.5) * room(handling) + rubbing() + hum()


def record(dry):
    """Band limit: nothing passes from TOP_HZ up."""
    return filtered(dry, lambda hz: hz < TOP_HZ)


dry = scene()
out = record(dry)
generate_wav(out)
```